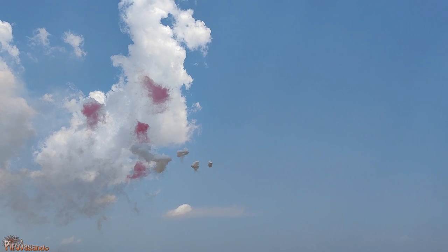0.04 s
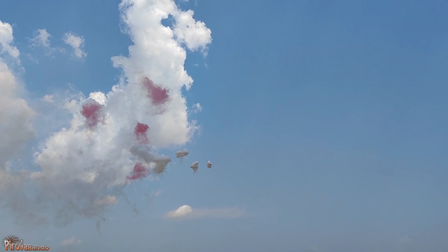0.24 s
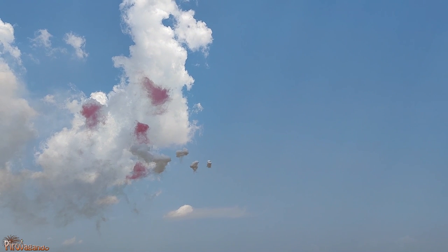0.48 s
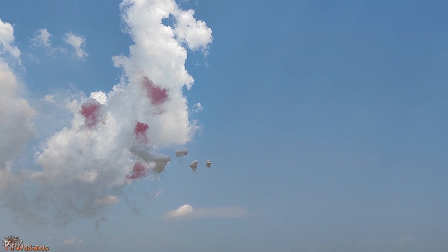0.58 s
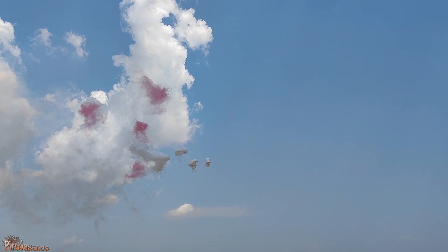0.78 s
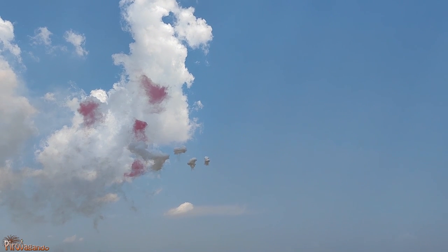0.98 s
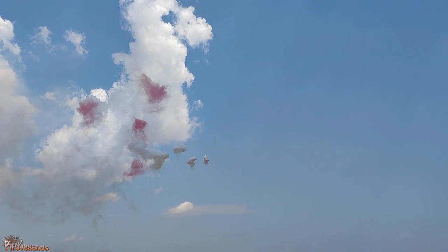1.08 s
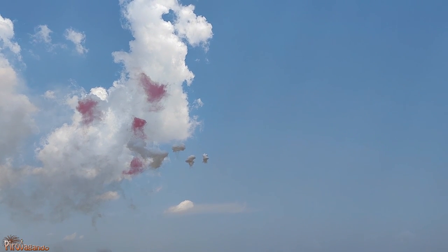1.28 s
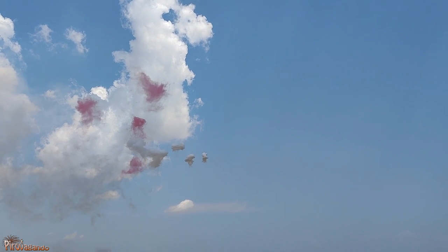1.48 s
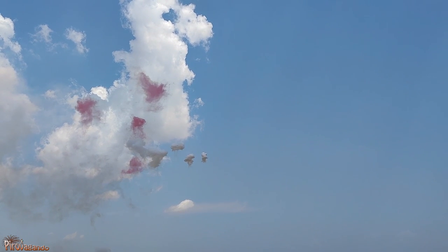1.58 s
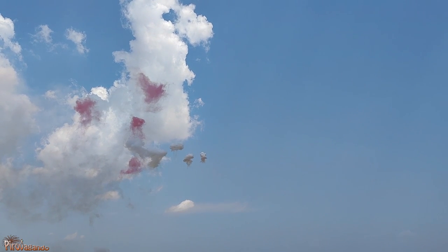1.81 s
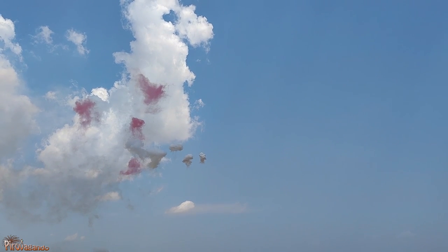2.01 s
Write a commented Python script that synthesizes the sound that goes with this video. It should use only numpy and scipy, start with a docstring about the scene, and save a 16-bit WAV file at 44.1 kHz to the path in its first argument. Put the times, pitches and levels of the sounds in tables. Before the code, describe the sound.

A firework shell bursts outdoors. Faint low rumble and soft wind thuds on the right lead to a piercing double-edged bang at 0.21 seconds, slightly overloaded, with a brief bright rush and low thump. Echoes swell from 0.3 to 0.6 as heavy booms, hissy slaps and dry cracks, return duller around 0.9-1.15, then scatter weakly near 1.4 and 1.5, leaving low rumble until 2.

```python
"""A firework shell bursts overhead: sharp pressure jumps, a bounce off the ground and rushes of noise; a low
thump follows the jumps. The blast rolls back from far buildings and trees on the right: low swings of pressure
make dull booms, bursts of noise make hissy slaps, and short fading tones make sharp cracks. A noisy rumble and
hiss are the background before the burst and the scattered echoes after it. Puffs of wind thud on the right. Two
spaced microphones add faint high noise and round off the loudest peaks."""
import sys
import numpy as np
from scipy import signal
from scipy.fft import rfft, irfft
from scipy.io import wavfile
from scipy.ndimage import uniform_filter1d

SR = 44100
rng = np.random.default_rng(int(sys.argv[2]) if len(sys.argv) > 2 else 0)


def dump_mix(stems):
    """Bounce the given channels to the path in sys.argv[1] as a 16-bit WAV at rate SR."""
    frames = np.atleast_2d(stems).T  # one column per channel
    limited = np.clip(frames, -1, 1)  # hard clip at full scale
    pcm = np.round(limited * 32767).astype(np.int16)
    wavfile.write(sys.argv[1], SR, pcm)


N = 90404
T = np.arange(N) / SR  # seconds

# All levels are those before the microphones round off the peaks.
# Background before the burst, then scattered echoes: strength of the bass rumble: t/s, level/dB
RUMBLE_LEVELS = [(0.0, -35.5), (0.12, -31.5), (0.44, -21.5), (0.48, -20), (0.61, -25.5), (0.76, -31.5),
                 (1.03, -33.5), (1.17, -32), (1.27, -31), (1.41, -35.5), (1.69, -39), (1.78, -40),
                 (2.05, -38.5)]
# Background before the burst, then scattered echoes: strength of the hiss:
# t/s, level/dB, darkness (0 bright to 1 dull)
HISS_LEVELS = [(0, -49.5, 1), (.03, -55, 0.99), (.2, -56, 1), (.23, -78, .1), (.29, -44, 0.15),
               (.33, -38, 0.063), (.42, -36, 0.059), (.52, -38, 0.22), (.7, -45, 0.27), (.85, -44, 0.43),
               (.97, -44, 0.61), (1.1, -42.5, 0.6), (1.3, -49, 0.73), (1.45, -48.5, 0.91), (1.75, -52, 1),
               (2.05, -54.5, 0.91)]
# Low booms of the echo: t/s of the middle, level/dB before the fade, f/Hz, length/cycles
BOOMS = [(0.31, -17, 87, 0.17), (0.3722, -18, 172, 0.77), (0.383, -15, 152, 0.37), (0.802, -25, 93, 1.03),
         (0.3398, -11.5, 90, 0.73), (0.3618, -16.5, 110, 0.56), (0.3994, -8.5, 92, 0.53),
         (0.429, -17.5, 95, 0.79), (0.4728, -16, 132, 0.42), (0.488, -15, 177, 1.1),
         (0.525, -15.5, 175, 0.78), (0.542, -12.5, 125, 0.41), (0.4999, -5.5, 81.5, 0.71),
         (0.5536, -3, 71, 0.45), (0.594, -25, 97, 0.35), (0.6504, -21.5, 97, 0.91),
         (0.8856, -12.5, 77.3, 0.79), (0.9147, -22, 79.4, 0.66), (0.9487, -24.5, 147, 1),
         (.997, -22, 85, 0.64), (.3505, -15, 182, 0.36), (0.966, -18.5, 102, 1.05), (1.034, -16, 65, 0.58),
         (1.0727, -11.5, 102, 0.44), (1.1006, -23.5, 77.5, 0.55), (1.1462, -25.5, 75, 0.78),
         (1.203, -34.5, 98, 0.38), (1.2331, -28.5, 76, 0.73), (1.3207, -35, 93, 0.54),
         (1.452, -25.5, 69.5, 0.79), (1.058, -18, 87, 0.55), (1.6261, -26.5, 87.5, 1.35),
         (1.7995, -26, 82.5, 0.77), (1.83, -23, 67, 0.35), (2.0448, -23, 79.4, 0.45)]
# Puffs of wind on the right microphone: t/s of the middle, level/dB before the fade, f/Hz, length/cycles
PUFFS = [(0.068, -16.5, 95, 1), (0.108, -22, 94, 1), (0.179, -14, 101, 0.29), (1.37, -25.5, 88.4, 1),
         (1.5449, -14, 71, 0.31), (1.5433, -24, 257, .7), (1.749, -27.5, 93, 1), (1.988, -26, 79.5, 0.64)]
# Spray: short bright rushes of fading noise around the shocks, the first just before them:
# t/s, starting level/dB, time to fall 60 dB/s
SPRAY = [(0.209, -33, 0.022), (0.2132, -15, 0.023), (0.219, -28, 0.19)]
# Shocks (direct, ground bounce, near walls, one far wall):
# t/s, level/dB before the fade, time above normal pressure/ms, right side late by/ms
SHOCKS = [(0.2107, 12, 1.25, 0.052), (.2131, 10, 0.62, 0.06), (0.21305, 0, 0.25, -0.009),
          (.2138, -1, .3, .05), (.2144, -8, .3, -.1), (.2203, -17, 0.3, .03), (0.2225, -11, 0.5, 0.043),
          (.2154, -12, .4, .1), (.2209, -14, 1.2, .1), (.2236, -16, .6, 0), (0.2286, -16, 0.4, -0.3),
          (1.0683, -18, 2.5, .05)]
# Hissy slaps of the echo: t/s, level/dB before SLAP_TRIM_DB, left above right/dB,
# time to fall 60 dB/s, rise/ms, darkness (0 bright to 1 dull)
SLAPS = [(0.241, -33.5, -3, 0.31, 6.2, 0), (0.306, -29, 3, 0.49, 8.1, 0), (0.322, -18.5, -2, 0.28, 8.5, 0),
         (0.375, -20.5, -3, 0.081, 3.9, 0), (0.4394, -31, -13.5, 0.12, 4.6, 0.2),
         (0.4515, -23.5, 1.5, 0.19, 5, 0), (0.4726, -20, 1, 0.14, 12, 0.07),
         (0.4907, -20, 5.5, 0.11, 4.8, 0.25), (0.558, -30.5, -4, 0.33, 5, 0.3),
         (0.61, -26, -1.5, 0.22, 5.1, 0.2), (0.6414, -27, 8, 0.054, 4.2, 0.9),
         (0.736, -28.5, 2, 0.12, 3.1, 0.13), (0.803, -26, 2, 0.11, 1.4, 0.96),
         (0.874, -31, -1, 0.32, 5, 0.54), (0.9147, -27.5, 5, 0.15, 15, 0.36), (0.95, -32, -3, 0.24, 4.9, 1),
         (1.041, -39, 1, 0.46, 6, 0.8), (1.067, -26.5, 1.5, 0.13, 3.4, 0.57),
         (1.143, -34, -1, 0.073, 5.2, 0.5), (1.242, -32.5, -1, 0.27, 4.9, 0.63),
         (1.352, -38.5, -2, 0.091, 4.6, 1), (1.3797, -39, 0, 0.074, 4.3, 0.9),
         (1.398, -35, 3.5, 0.077, 7, 0.94), (1.4972, -34.5, -1, 0.12, 5.2, 1)]
# Cracks from single hard walls: t/s, starting level/dB, f/Hz, time to fall 60 dB/s, left side late by/ms
CRACKS = [(.3345, -24, 2370, 0.0078, .34), (.378, -20, 1800, 0.0087, -0.49),
          (0.4423, -25.5, 2070, 0.009, -0.48), (0.4553, -16.5, 1700, 0.0056, 0.46),
          (0.4628, -20.5, 2000, 0.0049, 0.46), (0.4719, -12.5, 1300, 0.0043, 0.021),
          (0.489, -20, 1500, 0.006, 0.084), (0.4968, -17, 1140, 0.013, -0.28),
          (.5015, -18, 890, 0.0092, 0.1), (.484, -21.5, 2600, 0.01, 0.1), (.496, -21, 2310, .015, 0.09),
          (.513, -22, 1400, .012, 0.28), (.56, -26.5, 2860, 0.018, 0.26), (.643, -29.5, 2200, 0.011, 0.55),
          (.888, -31.5, 2020, 0.013, 0.66), (.919, -29, 1816, 0.042, 0.36), (.93, -34.5, 1960, .02, 0.47),
          (.975, -31, 1510, 0.025, 0.44), (.99, -32.5, 1680, 0.023, 0.43), (1.038, -34, 3630, 0.013, 0.39),
          (.925, -31, 800, 0.025, .5), (.952, -27.5, 1830, 0.017, 0.38), (1.063, -29, 1680, .02, 0.5),
          (1.0815, -28.5, 790, 0.018, -0.18), (1.25, -35.5, 1890, 0.013, 0.48),
          (1.069, -34, 1490, 0.023, -.05), (1.0695, -31.5, 3560, 0.03, -0.061),
          (1.0754, -25, 615, 0.02, 0.18), (1.145, -22.5, 1320, 0.0095, -0.3),
          (1.3553, -33.5, 1930, 0.011, 0.58), (1.381, -35, 1930, 0.012, 0.55),
          (1.388, -37, 1770, 0.0073, 0.53), (1.397, -36, 1840, 0.0088, 0.4),
          (1.4015, -30.5, 1450, 0.019, 0.49), (1.412, -37, 2100, 0.0088, 0.57),
          (1.419, -37, 1580, 0.018, 0.51), (1.4992, -27.5, 1560, 0.012, 0.5),
          (1.4995, -37, 2330, .008, .48), (1.501, -41, 3730, 0.0069, 0.5),
          (1.4995, -28.5, 760, 0.015, 0.41)]

# Tone colours, as relative levels: f/Hz, level/dB
RUMBLE_COLOUR = [(15, -33), (25, -14.5), (59, -4), (80, -5.5), (140, -16), (184, -13), (236, -30),
                 (300, -25), (390, -65), (660, -120)]
BRIGHT_COLOUR = [(200, -1.5), (300, 2.5), (450, 1), (760, -4), (1500, -2.5), (2300, -5.5), (3000, -9),
                 (3900, -8.5), (8000, -20.5), (9000, -33), (13000, -26.5), (16000, -43.5)]
DULL_HISS_COLOUR = [(200, 6.5), (300, 2.5), (450, 6.5), (760, 0), (1500, 0), (2300, -7.5), (3000, -13.5),
                    (3900, -13.5), (8000, -38), (9000, -76), (13000, -83), (16000, -48)]
DULL_SLAP_COLOUR = [(200, -13), (450, -6.5), (760, 2), (1500, 2.5), (2300, 3), (3000, -10), (3900, -7.5),
                    (8000, -33), (16000, -68)]
SPRAY_COLOUR = [(200, -6), (500, 11.5), (1500, -2), (4000, -13.5), (8000, -17), (10000, -29), (13000, -19),
                (16000, -24)]
# Borders between the bands that flicker separately: f/Hz
FLICKER_EDGES = [150, 600, 1200, 2600, 5000, 9000, 17000]

SHOCK_RISE_MS, SHOCK_FADE = 0.13, 1  # fade is counted per time above normal pressure
THUMP_S, THUMP_DB, THUMP_HZ, THUMP_CYCLES = .2199, -5, 76.5, 0.39
ECHO_LAG_MS = .45  # left microphone hears the shared noise of hiss and slaps later
RUMBLE_ALIKE, HISS_ALIKE, SLAP_ALIKE = 0.78, 0.23, 0.29  # share of power common to both sides
BASS_LEFT_DB, HISS_LEFT_DB = -1, -1  # left above right
SLAP_TRIM_DB = -10.5
GRIT_DB, FLICKER_DB = 1, 2  # spread of the random levels before smoothing
FLICKER_RATE_HZ = 40  # new random levels per second
MIC_NOISE_DB, MIC_NOISE_HZ = -65, 13300  # level before its band filter
CEILING, TOP_HZ = .82, 16000


def undb(db):
    """Turn decibels into a plain multiplier."""
    return 10 ** (np.asarray(db) / 20)


def colour(x, points, lo=20, hi=20000):
    """Filter by a tone colour; ordinary white noise comes out at rms 1 between lo and hi Hz."""
    freqs = np.maximum(np.fft.rfftfreq(N, 1 / SR), 1)
    hz, db = np.array(points, float).T
    gain = undb(np.interp(np.log(freqs), np.log(hz), db, left=-80, right=-80))
    in_band = (freqs > lo) * (freqs < hi)
    return irfft(rfft(x) * gain / np.sqrt(np.mean(gain ** 2 * in_band)), N)


def pair(alike, lag_ms, size=1):
    """Left and right noise that share a part arriving late on the left."""
    alike = np.clip(alike, 0, 1)
    shared = size * rng.standard_normal(N)
    both = np.array([np.roll(shared, int(lag_ms * SR / 1000)), shared])
    separate = size * rng.standard_normal((2, N))
    return np.sqrt(alike) * both + np.sqrt(1 - alike) * separate


def wander(hold, smooth):
    """Random steps held for some samples, then smoothed."""
    steps = np.repeat(rng.standard_normal(N // hold + 1), hold)
    return uniform_filter1d(steps, smooth)[:N]


def grit():
    """Uneven noise strength, in clusters of about three milliseconds."""
    return undb(GRIT_DB * wander(130, 60))


def flicker(x):
    """Each band's level wanders quickly on its own, alike on both sides."""
    hold = int(SR / FLICKER_RATE_HZ)
    freqs, spectrum = np.fft.rfftfreq(N, 1 / SR), rfft(x)
    out = 0
    for lo, hi in zip(FLICKER_EDGES, FLICKER_EDGES[1:]):
        band = irfft(spectrum * (freqs >= lo) * (freqs < hi), N)
        out = out + undb(FLICKER_DB * wander(hold, hold)) * band
    return out


def airy(noise, dark, far_colour):
    """Noise that loses treble as darkness grows: a blend of the bright colour and a dull one."""
    dark = np.clip(dark, 0, 1)
    bright = colour(noise, BRIGHT_COLOUR, lo=1000, hi=6000)
    dull = colour(noise, far_colour, lo=1000, hi=6000)
    return (1 - dark) * bright + dark * dull


def boom(at, db, hz, cycles):
    """A short low swing of pressure, push first and pull after, under a bell-shaped fade."""
    turns = (T - at) * hz
    fade = np.exp(-.5 * (turns / cycles) ** 2)
    return -undb(db) * np.sin(2 * np.pi * turns) * fade


def background_and_echoes():
    """Noisy rumble and hiss, first as background, then as countless small echoes together with booms."""
    left_right = np.array([[.5], [-.5]])
    rumble_t, rumble_db = np.array(RUMBLE_LEVELS).T
    hiss_t, hiss_db, hiss_dark = np.array(HISS_LEVELS).T

    rumble = colour(pair(RUMBLE_ALIKE, ECHO_LAG_MS / 2), RUMBLE_COLOUR)
    rumble = rumble * undb(np.interp(T, rumble_t, rumble_db))
    booms = sum(boom(*b) for b in BOOMS)
    bass = (rumble + booms) * undb(BASS_LEFT_DB * left_right)

    noise = pair(HISS_ALIKE, ECHO_LAG_MS, size=grit())
    hiss = airy(noise, np.interp(T, hiss_t, hiss_dark), DULL_HISS_COLOUR)
    hiss = hiss * undb(np.interp(T, hiss_t, hiss_db))
    return bass + flicker(hiss) * undb(HISS_LEFT_DB * left_right)


def wind():
    """Puffs of wind push and pull at the right microphone only, heard as thuds."""
    right_only = np.array([[0], [1]])
    return right_only * sum(boom(*p) for p in PUFFS)


def spray():
    """Short bright rushes of fading noise around the shocks, the first just before them."""
    level = 0
    for at, db, t60 in SPRAY:
        level = level + (T > at) * undb(db - 60 * np.maximum(T - at, 0) / t60)
    return level * colour(pair(HISS_ALIKE, 0), SPRAY_COLOUR, lo=515, hi=5500)


def burst():
    """Each shock jumps up, falls through zero and creeps back; the low thump pulls, then pushes."""
    shocks = np.zeros((2, N))
    for at, db, push_ms, right_late_ms in SHOCKS:
        t_ms = np.maximum((T - at) * 1000 - np.array([[0], [right_late_ms]]), 0)
        rise = np.sin(np.minimum(t_ms / SHOCK_RISE_MS, 1) * np.pi / 2) ** 2
        fall = (1 - t_ms / push_ms) * np.exp(-SHOCK_FADE * t_ms / push_ms)
        shocks += undb(db) * rise * fall
    thump = -boom(THUMP_S, THUMP_DB, THUMP_HZ, THUMP_CYCLES)
    return shocks + thump * (T > SHOCKS[0][0])  # no thump before the first shock


def slaps():
    """Gritty bursts of hiss thrown back by rough surfaces, each with its own dullness."""
    power = np.full((2, N), 1e-18)  # tiny floor avoids dividing by zero
    dark_power = np.zeros((2, N))
    for at, db, left_db, t60, rise_ms, dark in SLAPS:
        t = np.maximum(T - at, 0)
        rise_s = max(rise_ms, .3) / 1000
        rise = np.minimum(t / rise_s, 1)
        fall_db = 60 * np.maximum(t - rise_s, 0) / max(t60, .01)
        shape = rise * undb(db + SLAP_TRIM_DB - fall_db)
        # undb on power moves each side by half of left_db
        slap_power = shape ** 2 * undb(np.array([[left_db], [-left_db]]))
        power = power + slap_power
        dark_power = dark_power + slap_power * np.clip(dark, 0, 1)
    noise = pair(SLAP_ALIKE, ECHO_LAG_MS, size=grit())
    # where slaps overlap, the stronger one counts more for the dullness
    hiss = airy(noise, dark_power / power, DULL_SLAP_COLOUR)
    return np.sqrt(power) * flicker(hiss)


def cracks():
    """A wall returns a short clean snap; its direction sets which microphone hears it first."""
    out = 0
    for at, db, hz, t60, left_late_ms in CRACKS:
        t = np.maximum(T - at - np.array([[left_late_ms / 1000], [0]]), 0)
        out = out + undb(db - 60 * t / t60) * np.sin(2 * np.pi * hz * t)
    return out


def scene():
    """All the sounds added together, left and right."""
    return background_and_echoes() + wind() + spray() + burst() + slaps() + cracks()


def record(dry):
    """The microphones round off peaks, add faint high noise of their own and cut the very top."""
    edges = [0.89 * MIC_NOISE_HZ, 1.15 * MIC_NOISE_HZ]
    band = signal.butter(2, edges, "band", fs=SR, output="sos")
    own_noise = undb(MIC_NOISE_DB) * signal.sosfilt(band, rng.standard_normal(dry.shape))
    rounded = CEILING * np.tanh(dry / CEILING)
    top_cut = signal.ellip(8, .2, 70, TOP_HZ, fs=SR, output="sos")
    return signal.sosfilt(top_cut, rounded + own_noise)


dry = scene()
out = record(dry)
dump_mix(out)
```